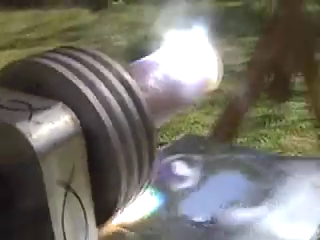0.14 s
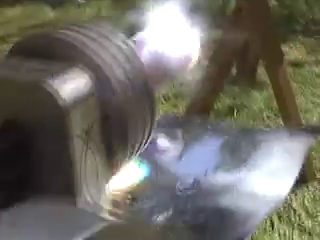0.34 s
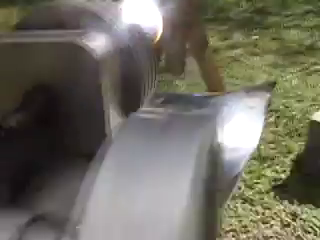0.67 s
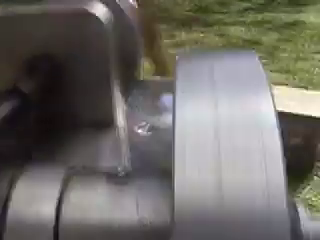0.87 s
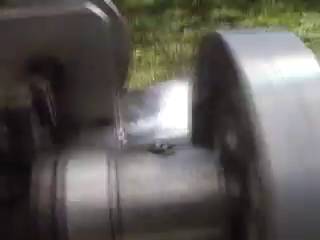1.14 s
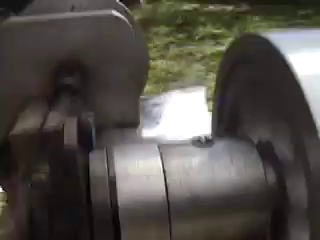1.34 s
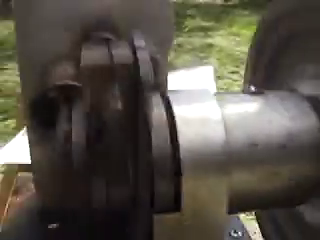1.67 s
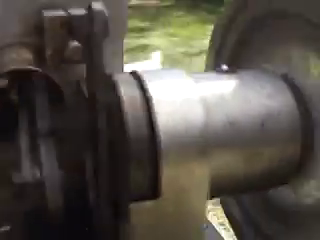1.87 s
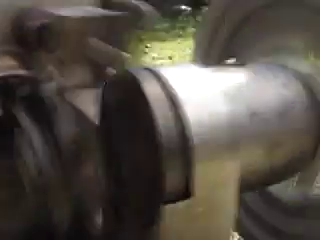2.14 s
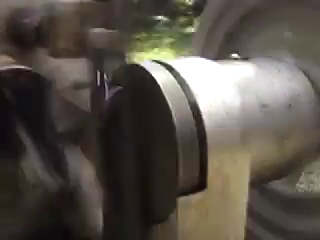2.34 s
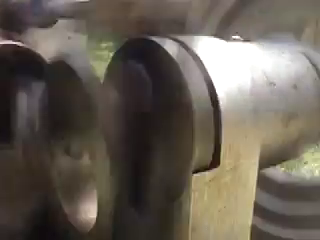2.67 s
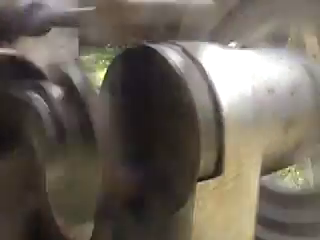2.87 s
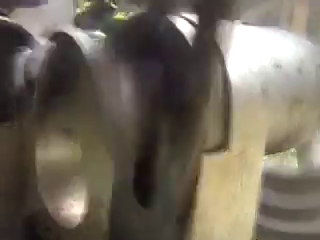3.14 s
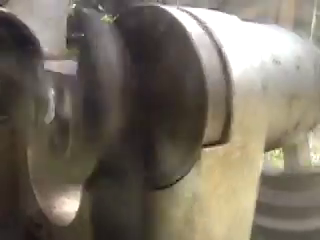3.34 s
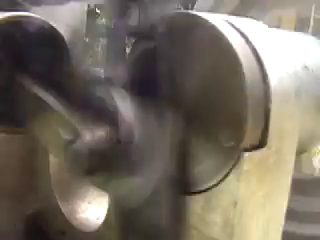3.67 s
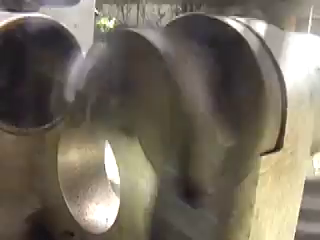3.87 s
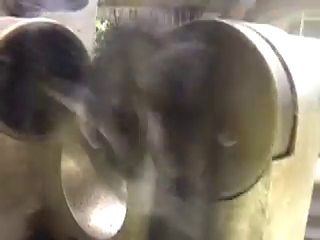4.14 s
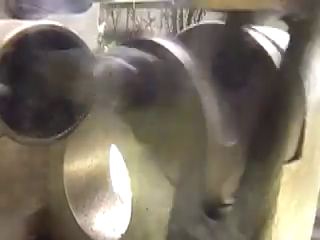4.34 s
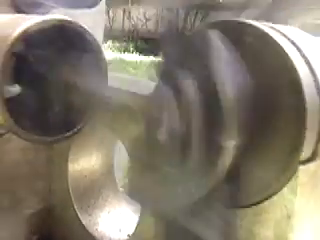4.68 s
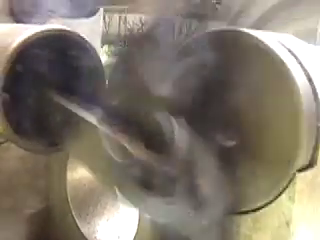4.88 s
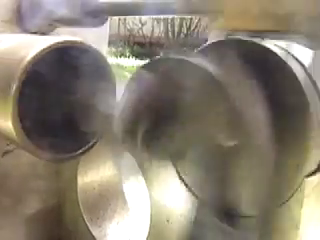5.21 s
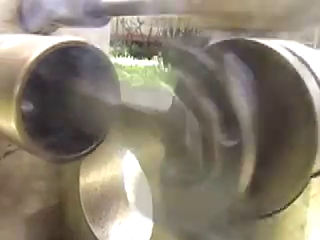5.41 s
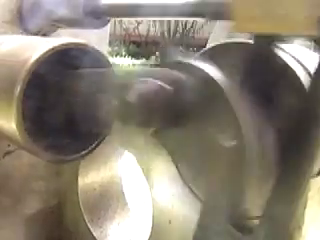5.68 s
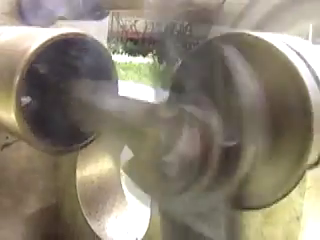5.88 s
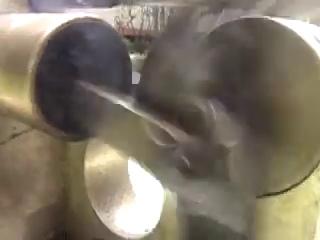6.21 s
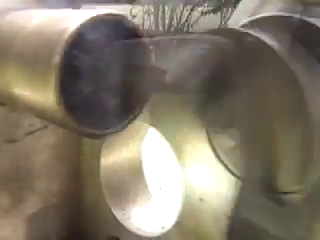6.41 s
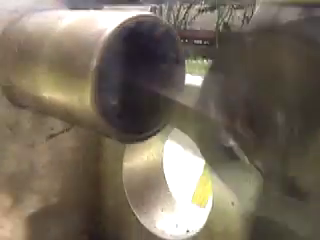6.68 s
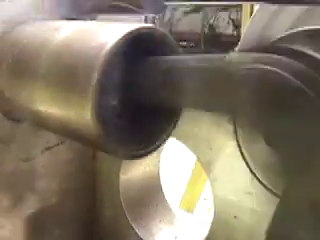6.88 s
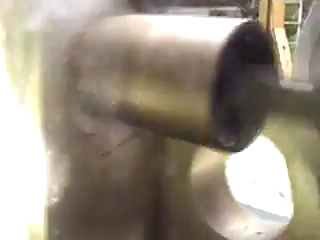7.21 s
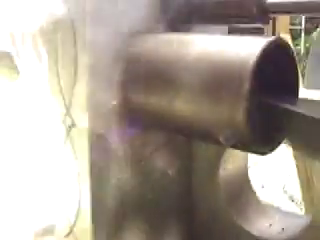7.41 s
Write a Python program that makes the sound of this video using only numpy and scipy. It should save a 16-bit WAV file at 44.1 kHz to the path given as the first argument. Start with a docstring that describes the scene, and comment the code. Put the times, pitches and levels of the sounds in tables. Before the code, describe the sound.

A little hot-air engine runs steadily on a lawn, heard from very near with no room echo. Dry, short metal knocks, clacks and slaps repeat in the same gallop every turn, with small bounces and loose rattles between. A thin high ringing of fins clings to the start. Bearing rumble and light outdoor noise stay underneath. The sound leans left at first, centres while passing the crank, then shifts somewhat right by the cylinder.

```python
"""A small hot-air engine runs on a lawn at about 400 turns a minute, close to a hand-held stereo microphone.
Every turn the play in crank, rods and pins closes as tick, knock, clack, slap, tap, pin and rattle, each a
ragged push ringing the metal body; cooling fins ring on high after clack and slap. Noise swelling with the
crank angle makes the stand's rumble, steady bands of noise the breeze and outdoor air. Meanwhile the
microphone drifts from the hot end past the crank to the cylinder, and levels and colour follow."""
import sys
import numpy as np
from scipy import signal
from scipy.io import wavfile
from scipy.ndimage import uniform_filter1d

SR = 44100
rng = np.random.default_rng(int(sys.argv[2]) if len(sys.argv) > 2 else 0)


def attenuation_scalar(level_db):
    """Turn a level in dB into a linear amplitude multiplier (20 dB per decade)."""
    decades = np.asarray(level_db, float) / 20
    return 10 ** decades


def master(y):
    """Save y as 16-bit WAV."""
    cut = np.clip(np.atleast_2d(y).T, -1, 1)
    pcm = np.round(cut * 32767)  # scale
    wavfile.write(sys.argv[1], SR, pcm.astype(np.int16))


N = 332501

# crank angle, the speed steady between rows: (time [s], turns done [turns])
CRANK_TURNS = [(.0200, 0), (.7766, 5), (1.2274, 8), (2.2728, 15), (3.7630, 25), (5.2502, 35), (5.9919, 40),
               (6.4392, 43), (7.4859, 50)]
# place of the microphone: (time [s], hot end faced [0-1], cylinder faced [0-1], rod in view [0-1],
# crank pin uncovered [0-1], nearness to the stand [dB], left over right [dB])
MIC_PATH = [(0.0, 0.8, 0.04, 0.5, .01, 5.5, 5), (.5, 0.62, 0, 0, 0.4, 5.5, 4),
            (.95, 0.29, 0.08, 1.1, 0.1, 4.5, 3), (1.25, 0.2, 0.01, 1, 0.3, 3.5, 1.5),
            (1.45, 0.06, 0.3, 0, 0, 3.5, 1), (1.9, 0.23, 0.19, 0.2, 0, 3.5, .2),
            (2.15, 0, 0.08, .9, 0, 2.5, 0.5), (2.7, 0.04, 0.12, 0.6, 0.5, 1, 0.5),
            (3.1, 0, 0.11, 0.94, 1.1, 1.1, .3), (3.6, 0.13, 0.13, 0.7, 1, 2.1, 1),
            (4.1, 0.05, 0.04, 0.7, 0.3, 0.4, 0), (4.8, 0.04, 0.15, 1, 1, 0.7, -1.1),
            (5.5, .02, 0.23, 0.74, 0.8, 0.4, -0.8), (6.3, 0, 0.35, 0.9, 1, -0.4, -1.1),
            (6.55, 0, 0.78, 0.1, 0.9, -0.5, -0.5), (7.0, 0, 0.8, 0.05, 0.5, -0.6, -2),
            (7.54, .02, 1.01, 0, 0.3, -2, -4)]
# tick, knock, clack, slap, tap, pin, rattle:
# (delay after the whole turn [ms], wander [ms], peak level [dB], scatter [dB])
CONTACT_CYCLE = [(-17.0, 0.15, -24.5, 0.6), (.5, .12, -7, 0.3), (21.5, .12, -6.5, -0.65),
                 (28.5, 0.21, -9, -1.9), (56, 0.16, -26.5, -1.5), (80, .9, -15, -0.25),
                 (94.5, 1.6, -16, 1.5)]


def rms_one(x):
    """Scale to rms 1."""
    return x / np.sqrt(np.mean(x ** 2) + 1e-20)


def at_hz(points, hz):
    """Read a spectrum on a log-frequency axis."""
    point_hz, point_db = np.transpose(points)
    return np.interp(np.log(hz), np.log(point_hz), point_db)


def in_time(rows, s):
    """Columns of a curve table at the times s."""
    times, *columns = np.transpose(rows)
    return [np.interp(s, times, column) for column in columns]


def knocks():
    """Times at which the crank passes a whole turn."""
    s, turns = np.transpose(CRANK_TURNS)
    return np.interp(np.arange(turns[-1] + 1), turns, s)


def resonance(x, hz, width_hz):
    """Two-pole peak of gain 1."""
    r = np.exp(-np.pi * width_hz / SR)
    edge = (1 - r * r) / 2
    return signal.lfilter([edge, 0, -edge], [1, -2 * r * np.cos(2 * np.pi * hz / SR), r * r], x)


def banded_noise(spectrum):
    """Half-octave bands of stereo noise, each with its own level and left-right likeness; rms 1."""
    # left-right likeness of the noise: (frequency [Hz], correlation [0-1])
    likeness = [(30, 0.54), (70, 0.75), (150, 0.96), (400, 1), (1500, 0.97), (15000, 0.23)]
    out, white = 0, rng.standard_normal((2, 2, N))
    edges = 22 * 2 ** np.arange(0, 9.6, .5)
    for k, (low, high) in enumerate(zip(edges, edges[1:])):
        hz = np.sqrt(low * high)
        if spectrum[0][0] < hz < spectrum[-1][0]:
            band = signal.butter(2, [low, high], "band", fs=SR, output="sos")
            mid, side = signal.sosfilt(band, white[k % 2])   # neighbouring bands use different noise
            alike = np.clip(at_hz(likeness, hz), -1, 1)
            stereo = np.sqrt(1 + alike) * mid + np.sqrt(1 - alike) * side * [[1], [-1]]
            out = out + attenuation_scalar(at_hz(spectrum, hz)) * stereo
    return rms_one(out)


def breeze(level_db):
    """Low breeze: steady noise, strongest around 90 Hz."""
    # spectrum of the breeze: (frequency [Hz], relative level [dB per Hz])
    spectrum = [(15, -43), (25, -9.5), (87, 6), (200, 3), (260, -23), (440, -120)]
    return attenuation_scalar(level_db) * banded_noise(spectrum)


def air(level_db):
    """Open air over the lawn: steady noise of the middle and high range."""
    # spectrum of the outdoor air: (frequency [Hz], relative level [dB per Hz])
    spectrum = [(530, -47), (900, 27), (1460, 0), (2630, 9.5), (3640, 8), (4980, -1), (7770, -1.5),
                (14000, -49), (16000, -42)]
    return attenuation_scalar(level_db) * banded_noise(spectrum)


def fins(level_db):
    """Thin cooling fins ring on, high and long, after each clack and slap."""
    # modes of the cooling fins: (frequency [Hz], relative level [dB])
    fin_modes = [(10400, -12), (11260, -6), (11340, -2), (11420, -6), (11490, -5), (11600, 0), (11680, -8)]
    clack_slap_ms = np.array(CONTACT_CYCLE)[2:4, 0]
    at_s = np.add.outer(knocks(), clack_slap_ms / 1000).ravel()
    at = np.minimum(np.round(at_s * SR).astype(int), N - 1)
    out = 0
    for hz, db in fin_modes:
        clicks = np.full(N, 1e-18)
        clicks[at] = rng.standard_normal(len(at))
        out = out + attenuation_scalar(db) * rms_one(resonance(clicks, hz, width_hz=8.0))
    return attenuation_scalar(level_db) * out


def stand(rumble_db, hum_db):
    """Bearing and flywheel rumble through the stand, swelling with the crank angle; one resonance hums."""
    # spectrum of the rumble: (frequency [Hz], relative level [dB per Hz])
    spectrum = [(88, -15), (150, -4), (231, -1.5), (297, -5), (389, 8), (450, -11), (624, -3), (1500, -10),
                (1950, -13.5), (3300, -120)]
    # shaking with the crank: (multiple of the turn rate [1], swing [dB], peak at share of turn [turns])
    shake = [(1.0, 2.5, 0.028), (2.0, 4, 0.19), (3.0, 3.5, 0.0088)]
    hum_hz, width_hz = 381, 54
    turn, = in_time(CRANK_TURNS, np.arange(N) / SR)
    shake_db = sum(swing_db * np.cos(2 * np.pi * k * (turn - peak)) for k, swing_db, peak in shake)
    rumble = rms_one(banded_noise(spectrum) * attenuation_scalar(shake_db))
    hum = rms_one(resonance(resonance(rumble, hum_hz, width_hz), hum_hz, width_hz))
    return attenuation_scalar(rumble_db) * rumble + attenuation_scalar(hum_db) * hum


def ground(x):
    """One dull echo from the base plate."""
    lag_ms, echo_db, dull_hz = 2.7, -12, 5000
    echo = np.pad(x, ((0, 0), (int(lag_ms * SR / 1000), 0)))[:, :N]
    return x + attenuation_scalar(echo_db) * signal.sosfilt(signal.butter(1, dull_hz, fs=SR, output="sos"), echo)


def strikes(kind, at_s, peak_db, dull_db=0):
    """One kind of contact: a short ragged push rings the body's modes and its wash, much alike every time."""
    # tick, knock, clack, slap, tap, pin, rattle: (force rise [ms], force hold [ms], raggedness [dB],
    # wash level [dB], wash tilt [dB per octave])
    contacts = [(0.093, 1.7, 0, 13.5, 1), (0.063, 1.86, 4, 10, 0.6), (0.43, 5.15, 3.5, 6.5, 1.13),
                (0.23, 1.7, 6.5, 15.5, 2), (1.6, 2.6, 4.5, -14.5, -17), (0.28, 2.7, 4, 12, -0.5),
                (0.31, 7.26, 6.5, 7, 6.5)]
    # modes of the metal body: (frequency [Hz], t60 [s], then the strength [dB] with which
    # tick, knock, clack, slap, tap, pin and rattle strike the mode)
    body = [(230, 0.062, 5, -1.5, -27, -3, 17, -18.5, -17),
            (396.3, 0.11, -12, -28, -30, -17, 6.5, -6.5, -25), (536, 0.085, 7, -6, -22, -45, -21, -59, 6),
            (699, 0.055, -38, -45, -58, -51, -22, -60, 9), (1149, 0.039, -14, -62, -31, -0.5, -23, -1, -33),
            (1283, 0.01, -14, -23, 5, 10, 2, 11, 13.5), (1406, 0.013, -22, 8, -28, -3, 18, 1, -4),
            (1586, 0.032, 9.5, 6.5, -14, 3, -26, 2, 11.5), (1931, 0.0054, 6, -6, -14.5, 10, -28, -12.5, 19),
            (2053, 0.02, 8.5, 1.5, -36, 7.5, -24, 1, 18.5),
            (2380, 0.033, -24, -3.5, -41, -18.5, -35, -4, 12.5), (3070, 0.0099, -4, -5, -32, 4.5, 2, -9, 5),
            (3626, 0.0038, -9, 5, -12, 8, -17, 0, 12.5), (3874, 0.083, -9, -17.5, -12, -16, -42, -15, 0),
            (4318, 0.0047, -9, -4.5, -7.5, -1.5, -59, -9, 10.5),
            (4920, 0.017, -58, -2, -15.5, -28.5, -35, -45, 1.5),
            (5684, 0.0017, 7, 0.5, -6, 7.5, -39, -1.5, -36),
            (6650, 0.016, 10.5, -4, -53, -53, -25, -36, -36), (7420, 0.0058, 20, 14, -45.5, 7.5, -29, 1, 6),
            (7840, 0.0043, 7, 11, 3.5, -34, -30, -35, -46), (8584, 0.012, -23, -1, -4.5, -32, -31, 1, -12),
            (9244, 0.0079, -10, 8, -3.5, 2, -30, -2.5, -30),
            (10000, 0.0071, -21, 10, -33, 11.5, -33, -29, -22),
            (10790, 0.013, -27, -17, 0, 0, -35, -2, -36),
            (11800, 0.067, -38, -102, -56.5, -80, -50, -37, -40),
            (11960, 0.0058, -27, 1.5, -45, -1, -33, -27, -39),
            (13400, 0.0098, -28, -52, -73, -27, -37, -6, -21),
            (13600, 0.0047, -24, -50, -32, -49, -38, -25, -38)]
    # dense weak modes heard as a dying wash: (low edge [Hz], high edge [Hz], t60 [s])
    wash = [(600, 1800, .04), (1800, 4500, .032), (4500, 9000, .015), (9000, 15000, .009)]
    # colour when the microphone faces the hot end: (frequency [Hz], level [dB])
    hot_colour = [(800, 6), (1500, 8.5), (2800, 10), (4800, 8.8), (7800, -4), (12000, -4)]
    # colour when it faces the cylinder: (frequency [Hz], level [dB])
    cylinder_colour = [(800, -4.1), (1500, 1.5), (2100, -5.5), (3200, 4.5), (4800, -0.5), (7800, -2),
                       (12000, 1.2)]
    # colour when the crank pin is uncovered: (frequency [Hz], level [dB])
    crank_colour = [(5000, 0.14), (7800, 0.21), (10500, 0.5), (13000, 1.8)]
    mode_scatter_db, wash_scatter_db, wander_us = 2.5, 2.0, 11.4
    lag_rad, port_spread = 0.29, 0.32   # spread of mode log-gain [nepers], and share of unlike wash noise
    twin_ratio, twin_db, grain_ms = 1.017, -5, 0.35

    rise_ms, hold_ms, ragged_db, wash_db, tilt_db = contacts[kind]
    hz, t60, strength_db = np.array(body)[:, [0, 1, 2 + kind]].T
    # machined parts are nearly symmetric: every mode has a weaker twin close by
    hz, t60 = np.r_[hz, hz * twin_ratio], np.r_[t60, t60]
    strength_db = np.r_[strength_db, strength_db + twin_db]
    count, t = len(at_s), np.arange(4400) / SR
    hot, cylinder, _, uncovered, _, pan_db = in_time(MIC_PATH, at_s)
    faced = np.transpose([hot, cylinder, uncovered])

    def colour_db(f):
        """Colour of each strike from the microphone's place."""
        colours = [at_hz(colour, f) for colour in (hot_colour, cylinder_colour, crank_colour)]
        return faced @ np.array(colours) + dull_db * np.log2(f / 1000)

    scatter = mode_scatter_db * rng.standard_normal((count, len(hz)))
    gains = attenuation_scalar(strength_db + colour_db(hz) + scatter)
    # the same surfaces meet each turn: a mode keeps its phase up to a small wander in time
    usual = rng.random(len(hz))
    wander = hz * wander_us / 1e6 * rng.standard_normal((count, len(hz)))
    phase = 2 * np.pi * (usual + wander)
    # each mode reaches the two microphone ports with slightly different phase and strength
    lag = lag_rad * rng.standard_normal((2, 1, len(hz)))
    ports = np.exp(1j * lag + port_spread * rng.standard_normal((2, count, len(hz))))
    after = np.maximum(t - hold_ms / 1000, 0)   # ringing dies only once the push is over
    ringing = np.exp(np.outer(2j * np.pi * hz, t) - np.outer(np.log(1000) / t60, after))
    hits = ((gains * np.exp(1j * phase) * ports) @ ringing).imag

    short = 1800   # samples of wash
    noise = rng.standard_normal((count, short)) + port_spread * rng.standard_normal((2, count, short))
    for low_hz, high_hz, wash_t60 in wash:
        centre = np.sqrt(low_hz * high_hz)
        band = signal.sosfilt(signal.butter(2, [low_hz, high_hz], "band", fs=SR, output="sos"), noise)
        band *= 1000. ** (-after[:short] / wash_t60)
        band_db = wash_db + tilt_db * np.log2(centre / 3000) + colour_db(centre)
        band_db = band_db + wash_scatter_db * rng.standard_normal(count)
        hits[..., :short] += band * attenuation_scalar(band_db)[:, None]

    # tiny slips while the parts touch chop the push into grains
    knots = t[::8]
    keep = np.exp(-8000 / (grain_ms * SR))
    drive = rng.standard_normal((count, len(knots)))
    slips = rms_one(signal.lfilter([1], [1, -2 * keep, keep ** 2], drive))
    slips = np.array([np.interp(t, knots, row) for row in slips]) * np.exp(-after / 0.0096)
    fade = np.hanning(2 * len(t))[len(t):] ** .5
    hits *= (1 - np.exp(-t * 1000 / rise_ms)) * attenuation_scalar(ragged_db * slips) * fade
    # a small body radiates no bass
    hits = signal.sosfilt(signal.butter(4, 200, "high", fs=SR, output="sos"), hits)
    height = np.sqrt(uniform_filter1d(hits.mean(axis=0) ** 2, size=40).max(axis=1) * 2)
    hits *= (attenuation_scalar(peak_db + np.outer([.5, -.5], pan_db)) / height)[..., None]
    out = np.zeros((2, N + len(t)))
    for k, start in enumerate(np.clip(np.round(at_s * SR).astype(int), 0, N)):
        out[:, start:start + len(t)] += hits[:, k]
    return out[:, :N]


def linkage():
    """All contacts of crank, rods and pins as their play closes, with bounces and stray small rattles."""
    # answer of tick, knock, clack, slap, tap, pin, rattle to the microphone's place: (facing the hot end [dB],
    # facing the cylinder [dB], rod in view [dB], share of nearness [1])
    heard = [(-1.5, 2, 6.5, .1), (-2.3, -1.5, .1, .25), (-10.5, -4.5, -0.8, 0.97), (3.5, 2.3, -0.03, 0.11),
             (4.5, -7, 0, 0.54), (-5.5, -6.5, 1.2, 1), (-4.5, -9.5, -3.6, 0.39)]
    # bounces: (contact [0-6], delay after it [ms], level against it [dB], tilt [dB per octave])
    bounces = [(1, 7.1, -12.5, -1.2), (3, 4.6, -10, -1.8), (6, 5.8, -3, -1.2)]
    shared_blow_db = 1.23   # what the clack gains in a turn the slap loses
    pin_path_ms = 1.9   # pin and rattle arrive later at the cylinder
    bounce_jitter_ms, bounce_scatter_db = .5, -1.0
    knock_s = knocks()
    turns = len(knock_s)
    hot, cylinder, rod, _, near_db, _ = in_time(MIC_PATH, knock_s)
    ms, wander_ms, peak_db, scatter_db = np.transpose(CONTACT_CYCLE)
    late, stronger = rng.standard_normal((turns, 2, len(CONTACT_CYCLE))).transpose(1, 0, 2)
    times = (knock_s[:, None] + (ms + wander_ms * late) / 1000).T
    times[5:] += pin_path_ms * cylinder / 1000
    levels = (peak_db + scatter_db * stronger).T + np.array(heard) @ [hot, cylinder, rod, near_db]
    levels[2:4] += np.outer([1, -1], shared_blow_db * rng.standard_normal(turns))
    out = sum(strikes(kind, times[kind], levels[kind]) for kind in range(len(CONTACT_CYCLE)))
    for kind, after_ms, below_db, dull_db in bounces:
        late, stronger = rng.standard_normal((turns, 2)).T
        bounce_s = times[kind] + (after_ms + bounce_jitter_ms * late) / 1000
        bounce_db = levels[kind] + below_db + bounce_scatter_db * stronger
        out += strikes(kind, bounce_s, bounce_db, dull_db)
    # stray rattles at any time: faint, dull contacts of the pin kind
    stray_s = np.sort(rng.random(90)) * N / SR
    stray_db = -32 + 4 * rng.standard_normal(len(stray_s))
    return out + strikes(5, stray_s, stray_db, dull_db=-9.0)


def scene():
    """Linkage, stand, breeze, air and fins, balanced by the place of the microphone."""
    # stand, hum, breeze, air, fins: (level [dB], added facing the hot end [dB],
    # added facing the cylinder [dB], share of nearness [1])
    layers = [(-36.8, -.6, -.3, 1.01), (-42, 3, -8, 1.1), (-43, 1.1, -3, .9), (-51.5, 2.1, 1.1, 1.6),
              (-69, 17, -12, .6)]
    stand_pan_db, stand_pan_follows = -3.5, 0.47   # lies to the right; share of the left-right swing
    hot, cylinder, _, _, near_db, pan_db = in_time(MIC_PATH, np.arange(N) / SR)
    levels = np.array(layers) @ [np.ones(N), hot, cylinder, near_db]
    stand_db, hum_db, breeze_db, air_db, fins_db = levels
    aside = attenuation_scalar(np.outer([.5, -.5], stand_pan_db + stand_pan_follows * pan_db))
    outdoors = breeze(breeze_db) + air(air_db)
    return ground(linkage()) + aside * stand(stand_db, hum_db) + outdoors + fins(fins_db)


def band_limit(x):
    """A steep low-pass at the top of the band."""
    return signal.sosfilt(signal.butter(12, 16660, fs=SR, output="sos"), x)


def record(dry):
    """The microphone's top rolls off, its amplifier rounds the highest peaks, a steep filter ends the treble."""
    mic_top_hz, cutoff_hz, ceiling = 13300, 16600, .95
    soft = signal.sosfilt(signal.butter(6, mic_top_hz, fs=SR, output="sos"), dry)
    soft = ceiling * np.tanh(soft / ceiling)
    mix = signal.sosfilt(signal.cheby2(12, 70, cutoff_hz, fs=SR, output="sos"), soft)
    return band_limit(mix)


dry = scene()
out = record(dry)
master(out)
```